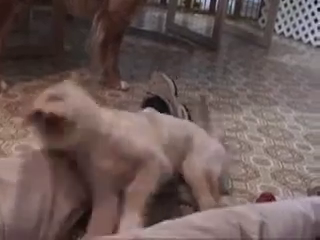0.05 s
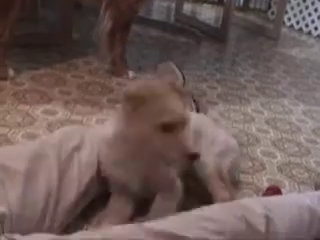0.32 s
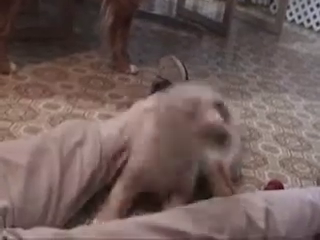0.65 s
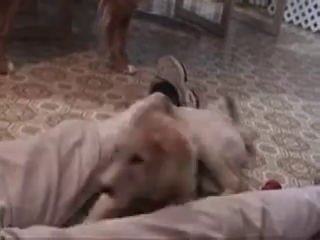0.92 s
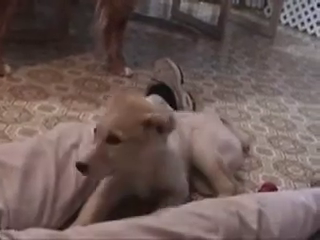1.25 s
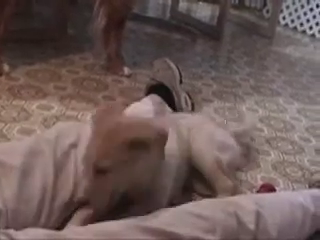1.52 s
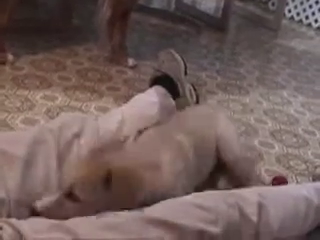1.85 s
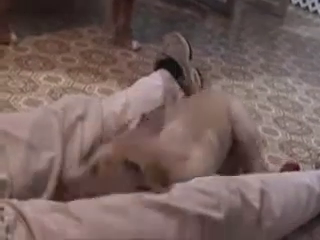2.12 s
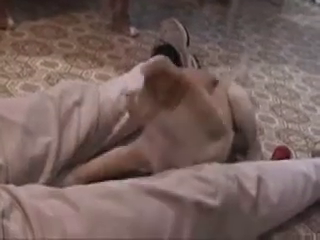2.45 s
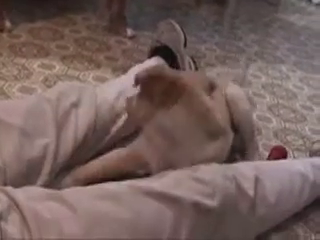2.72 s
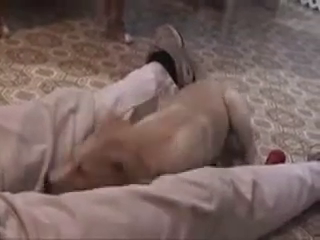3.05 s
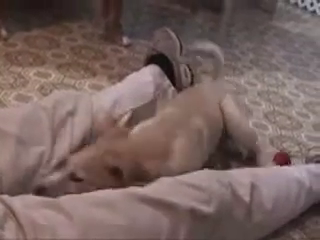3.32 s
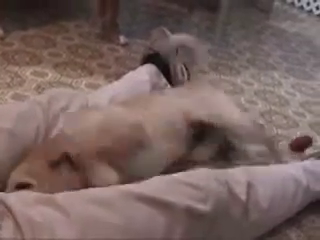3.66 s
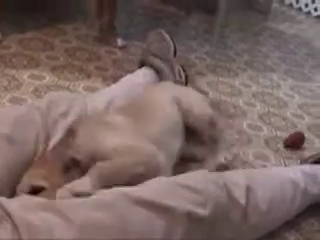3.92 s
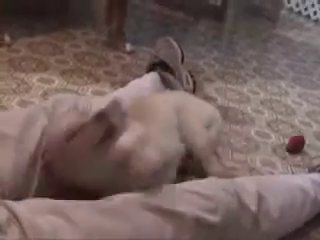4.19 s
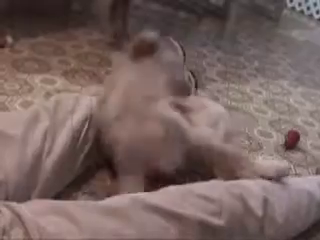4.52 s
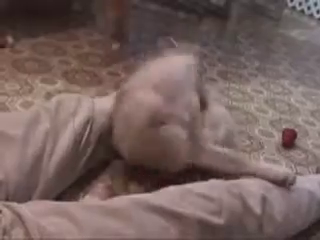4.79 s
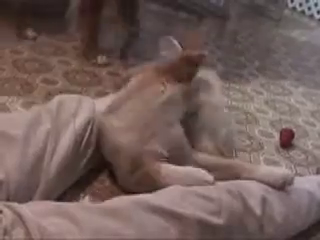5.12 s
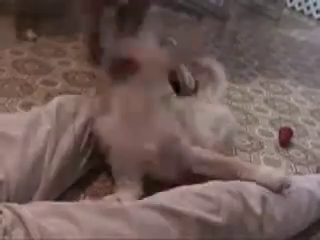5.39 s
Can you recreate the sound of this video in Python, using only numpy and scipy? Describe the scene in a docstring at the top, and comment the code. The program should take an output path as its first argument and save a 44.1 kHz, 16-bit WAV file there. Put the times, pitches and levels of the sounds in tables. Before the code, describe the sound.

A puppy play-fights on a hard kitchen floor, close to the microphone. It opens with thin nose whistles, a squeal and a whine, then its paws and body thump and its claws tick. A short bark sinks into a grumble. After a lull come more squeaks and a yelp that roughens into growls, with fur and a claw rubbing on trousers. A low groan slows to a rumble before a last thump.

```python
"""A puppy play-fights between a person's legs on a hard kitchen floor, close to the microphone.
First air whistles in its nose, and its vocal folds ring the throat in a squeal and a whine.
Paws and body thump the floor, claws tick, fur rubs on trousers. Near 2 s a bark sinks into a grumble.
After 3 s come more squeaks and a yelp that roughens into growls, while a claw rasps over cloth.
Last, a groan slows to a rumble before a final thump. A small room reverberates throughout."""
import sys
import numpy as np
from scipy import signal
from scipy.fft import rfft, irfft, next_fast_len
from scipy.io import wavfile
from scipy.ndimage import uniform_filter1d

SR = 44100
rng = np.random.default_rng(int(sys.argv[2]) if len(sys.argv) > 2 else 0)


def generate_wav(signal):
    """Clip the signal to [-1, 1] and save it as 16-bit WAV at the path in sys.argv[1]."""
    frames = np.transpose(np.atleast_2d(signal))
    scaled = np.clip(frames, -1, 1) * 32767
    pcm = np.round(scaled).astype(np.int16)
    wavfile.write(sys.argv[1], SR, pcm)


N = 245195
T = np.arange(N) / SR

# Fold vibration in each yelp: (start [s], end [s], first pitch [Hz], held pitch [Hz], last pitch [Hz],
# settling time [s], drooping time [s], first roughness [0-1], held roughness [0-1], last roughness [0-1])
YELP_FOLDS = {"squeal": (.09, .184, 1051, 936, 713, .011, .012, 0.091, .09, 0.15),
              "whine": (.18, .415, 513, 378, 328, .028, .012, .42, 0.036, .12),
              "bark": (1.81, 1.905, 398, 455, 290, 0.0045, .027, .9, .07, .7),
              "yelp": (3.222, 3.385, 452, 334, 330, 0.047, .03, .55, .12, .42)}
# Fold vibration in each growl: (time [s], pitch [Hz], roughness [0-1])
GROWL_FOLDS = {"grumble": [(1.9, 140.1, .9), (2.0, 129.3, .7), (2.11, 149.9, .9), (2.2, 128.6, 0.7)],
               "snarl": [(3.38, 166.4, .6), (3.44, 155.4, .95), (3.465, 162, .86), (3.485, 245.4, .44),
               (3.52, 248.8, .3), (3.555, 242.4, .9), (3.575, 224, 0.2)], "growl": [(3.86, 140.4, .7),
               (3.92, 157.4, .42), (4.03, 131.2, 0.6), (4.12, 124.2, .4), (4.16, 131.5, .5)],
               "tug": [(4.16, 130.8, .55), (4.31, 144, .5), (4.38, 125.6, .62)],
               "groan": [(4.635, 138.3, 0.8), (4.69, 155.9, .17), (4.77, 152.1, .16), (4.81, 145.5, .35)],
               "rumble": [(4.8, 146.7, 0.4), (4.88, 95.8, .7), (4.92, 91.94, .4), (5.03, 82.7, .45)]}
# Chest pushes driving each call: (start [s], length [s], low band [dB], middle band [dB], top band [dB])
CHEST_PUSHES = {"squeal": [(.093, .045, -66.5, -11, -40.5), (.139, .034, -62, -13.5, -30.5)],
                "whine": [(.172, .038, -27.5, -21, -27.5), (.222, 0.079, -29, -30.5, -47),
                (.297, .068, -22, -26.5, -37), (.378, .032, -25, -45, -55)],
                "bark": [(1.808, .009, -39.5, -14, -48), (1.817, .034, -23.5, -16.5, -38),
                (1.853, .024, -15.5, -16.5, -48.5)], "grumble": [(1.885, .032, -25, -36, -47.5),
                (1.955, .05, -29.5, -37.5, -49.5), (2.012, .04, -27.5, -40, -51.5),
                (2.075, .105, -37.5, -48, -70)], "snarl": [(3.372, .105, -29, -28, -47.5),
                (3.482, 0.067, -25.5, -29.5, -39), (3.556, .03, -32.5, -33, -56)],
                "yelp": [(3.221, 0.006, -42, -28, -53), (3.233, 0.035, -23.5, -16.5, -35.5),
                (3.276, .04, -23, -21.5, -36), (3.32, 0.057, -35, -29.5, -50)],
                "growl": [(3.85, .045, -24, -38, -60), (3.889, 0.058, -21.5, -32, -49),
                (3.955, .05, -22, -36.5, -56), (4.012, .145, -25.5, -43.5, -73)],
                "tug": [(4.154, .075, -23.5, -35.5, -54), (4.218, 0.11, -27.5, -41.5, -58)],
                "groan": [(4.639, .04, -36, -43, -44.5), (4.67, .046, -27.5, -29.5, -48.5),
                (4.72, .066, -28.5, -37.5, -67)], "rumble": [(4.802, .052, -29, -34, -67),
                (4.882, .07, -33.5, -61, -79), (4.966, .036, -37, -58, -62)]}
# Vocal tract responses, with peaks at the formants: (frequency [Hz], gain [dB])
SQUEAL_TRACT = [(300, -46), (700, -14), (950, 4), (1250, -12), (1650, -7.5), (1800, -18), (1900, -28.5),
                (2700, -33.5), (3500, -38.5), (3900, -47.5), (6000, -48.5), (9000, -41), (15000, -55)]
WHINE_TRACT = [(150, -33), (380, 3.5), (620, -3.5), (850, -0.5), (1150, -7.5), (1600, -23), (2000, -30),
               (2600, -14), (3100, -15), (4000, -28), (5200, -36.5), (8500, -28), (15000, -48.5)]
BARK_TRACT = [(200, -43.5), (420, -1), (620, -3), (840, 4.5), (1080, -21), (1330, -11.5), (1550, -21),
              (1800, -32.5), (2900, -26.5), (4500, -41.5), (8000, -46.5), (15000, -56)]
YELP_TRACT = [(200, -32), (380, 2), (640, -9.5), (810, 11), (930, 5), (1070, 2.5), (1500, -2.5),
              (2050, -32), (2900, -19.5), (3600, -15), (4400, -58), (12000, -49.5)]
GRUMBLE_TRACT = [(70, -19.5), (150, 3.5), (210, -3.5), (280, 1), (400, -1.5), (540, -3), (640, -19.5),
                 (850, -7), (1100, -17.5), (1450, -12), (1900, -30.5), (2950, -14), (4000, -50.5),
                 (12000, -39.5)]
SNARL_TRACT = [(120, -20.5), (330, 5.5), (500, 8), (620, -15), (780, 0), (1030, 1.5), (1320, -3.5),
               (1650, -13.5), (2050, -31), (2700, -20), (3600, -33), (4500, -48), (12000, -53)]
GROWL_TRACT = [(70, -29.5), (135, -3.5), (200, -6), (295, 1), (385, 3), (490, -7.5), (620, -18),
               (790, -5.5), (1050, -21), (1450, -27.5), (2050, -35.5), (2900, -27), (4500, -50),
               (9000, -70)]
TUG_TRACT = [(70, -27), (135, -8.5), (200, -8.5), (275, -1), (390, -6), (560, -10.5), (640, -14), (760, -5),
             (1050, -24), (1500, -16.5), (2050, -36), (2800, -30), (4000, -44), (9000, -46)]
GROAN_TRACT = [(80, -26), (155, -0.5), (310, -3.5), (460, 6), (620, -10), (850, -2), (1100, -14.5),
               (1600, -17), (1900, -18.5), (2400, -29), (3100, -27), (4500, -49), (10000, -37.5),
               (15000, -65.5)]
# Nose whistles: (start [s], length [s], first pitch [Hz], last pitch [Hz], level [dB])
NOSE_WHISTLES = [(0.034, .043, 6070, 6100, -39), (0.084, .023, 6760, 6060, -19),
                 (0.109, .05, 6150, 6620, -33.5), (.164, .01, 6850, 6930, -32.5),
                 (3.152, 0.025, 6010, 6250, -53), (3.172, 0.0155, 6200, 6410, -26),
                 (3.219, 0.0068, 6800, 6800, -41)]
# Blows of paws and body: (time [s], peak level [dB], contact cut-off [Hz])
FLOOR_BLOWS = [(.287, -31, 150), (.448, -38.5, 150), (.609, -25, 149), (.689, -41.5, 298),
               (.761, -24.5, 220), (.789, -19.5, 280), (.85, -41.5, 300), (.905, -12.5, 517),
               (1.647, -41.5, 220), (1.681, -28, 157), (2.017, -34.5, 400), (2.145, -35, 253),
               (3.036, -33, 128.7), (3.579, -36.5, 140), (3.826, -32, 177), (5.049, -21, 250)]
# Normal modes of the floor: (frequency [Hz], relative level [dB], time to decay by 60 dB [s])
FLOOR_MODES = [(127, -9, 0.12), (180, 11, 0.13), (216.6, 6, 0.24), (268, 12.5, 0.11), (334, 9.5, 0.099),
               (382, 0, 0.17), (500, 11.5, 0.045)]
# Claw and tooth contacts: (time [s], peak level [dB], cut-off [Hz], scrape decay time [s])
HARD_CONTACTS = [(.027, -42.5, 12120, .003), (.466, -26.5, 1600, 0.024), (0.688, -33.5, 3500, 0.00772),
                 (0.7718, -19, 1700, .004), (.854, -25.5, 1700, 0.0035), (1.519, -50.5, 2500, .006),
                 (1.65, -45, 1980, .006), (2.3933, -33, 1790, .007), (2.567, -41, 16000, 0.0019),
                 (2.963, -40.5, 1194, .02), (3.856, -29, 1600, 0.0061), (3.936, -33, 3500, .004),
                 (4.378, -28, 2000, .005), (5.309, -40, 6200, .006), (5.36, -42.5, 2200, .025)]
# Fur on cloth, bodies on the floor, a claw on the weave: (start [s], length [s], relative level [dB])
FUR_STROKES = [(.0, 0.14, -53), (.36, 0.18, -49), (.457, 0.076, -38), (1.87, 0.06, -51.5),
               (1.96, 0.3, -64.5), (3.66, 0.25, -66), (4.22, 0.14, -58.5), (5.29, 0.056, -60)]
SHUFFLES = [(.0, 0.86, -57.5), (.68, 0.18, -51), (1.6, .65, -53), (2.9, 0.37, -65), (3.16, 0.53, -53.5),
            (3.8, .6, -52.5), (4.635, 0.36, -52.5), (5.28, 0.24, -56)]
CLAW_DRAGS = [(4.22, .14, -58), (4.277, .019, -47), (4.358, .03, -49)]
# Spectra of the contact noises and of the background hush: (frequency [Hz], relative level [dB])
TICK_SPECTRUM = [(200, -24.5), (560, -15), (790, 1.5), (980, -3.5), (1220, 3.5), (1750, -12), (2450, -5.5),
                 (3200, -14.5), (7000, -19), (15000, -23)]
FUR_SPECTRUM = [(290, -60), (500, -30), (758, -10.5), (997, -24.5), (1510, -1), (1960, -10.5), (2930, -1),
                (3790, -5.5), (4440, -3.5), (15500, -12.5)]
SHUFFLE_SPECTRUM = [(40, -31), (80, -18.5), (130, -5), (190, -7), (300, -9), (450, -4.5), (600, -12.5),
                    (1150, -15.5), (1800, -15), (3000, -25.5), (6000, -30), (15000, -40.5)]
RASP_SPECTRUM = [(1500, -23), (3400, -2), (4450, 7), (5400, -16), (7000, -21), (15000, -20)]
HUSH_SPECTRUM = [(12, -39), (20, -16.5), (162, 0.5), (232, -11.5), (275, -1), (599, -18), (728, -5),
                 (1170, -5.5), (1310, -11.5), (2350, -10), (2850, -14), (3880, -11), (5420, -16.5),
                 (5890, -16), (15600, -21)]
# Balance at the microphone for each source position: (frequency [Hz], left minus right [dB])
HEAD_DOWN = [(130, 5), (260, -0.5), (440, 8.5), (520, -0.5), (630, -3.5), (800, -5), (980, -5.5),
             (1170, 5.5), (1400, 8.5), (1750, -4), (2200, -4), (2600, 5.5), (3200, -3), (4500, 2)]
HEAD_UP = [(130, 2.5), (340, 2.5), (450, 0), (650, -3.5), (930, -0.5), (1080, -7), (1350, 9), (1650, -20),
           (2100, 1), (3300, -7), (5000, -1)]
ON_FLOOR = [(130, 4), (480, 3), (750, -3.5), (1000, -4.5), (1400, 6.5), (2000, -2), (5000, 2)]
# Phase between the microphone ports: (frequency [Hz], lag of the left [rad])
PORT_LAG = [(90, 0.93), (170, 1.3), (280, 0.38), (450, 0.91), (750, 0.29), (1050, -0.91), (1550, -0.036),
            (2200, -1), (2800, 0.99), (4500, 0)]
# Reverberation of the kitchen: (frequency [Hz], time to decay by 60 dB [s])
ROOM_DECAY = [(150, 0.42), (500, 0.33), (1200, 0.39), (3000, 0.41), (7000, 0.27), (14000, .15)]
# Coherence of the diffuse field: (frequency [Hz], left-right correlation [-1 to 1])
COHERENCE = [(60, -0.59), (150, -0.42), (380, 0.15), (950, -0.56), (2380, 0.3), (5980, 0.48), (15000, 1)]


def yelps():
    """Nearly periodic fold vibration gives high, clear calls; the squeal breaks down an octave."""
    return (call("squeal", yelp_contour, SQUEAL_TRACT, attack_s=.027, release_s=.013, even_s=.023)
            + call("whine", yelp_contour, WHINE_TRACT, attack_s=.02, release_s=.011, even_s=.015)
            + call("bark", yelp_contour, BARK_TRACT, attack_s=.0076, release_s=.014, even_s=.0038)
            + call("yelp", yelp_contour, YELP_TRACT, attack_s=.011, release_s=.032, even_s=.014))


def growls():
    """Slow, aperiodic fold vibration is heard as roughness."""
    return (call("grumble", growl_contour, GRUMBLE_TRACT, attack_s=.024, release_s=.025)
            + call("snarl", growl_contour, SNARL_TRACT, attack_s=.023, release_s=.012, even_s=.014)
            + call("growl", growl_contour, GROWL_TRACT, attack_s=.026, release_s=.028, even_s=.016)
            + call("tug", growl_contour, TUG_TRACT, attack_s=.025, release_s=.023, even_s=.021))


def groan():
    """Steadier pulses give a low, clear tone that sinks to a rumble as their rate falls."""
    return (call("groan", growl_contour, GROAN_TRACT, attack_s=.022, release_s=.022)
            + call("rumble", growl_contour, GROWL_TRACT, attack_s=.012, release_s=.02))


def call(name, contour, tract, attack_s, release_s, even_s=.02, linger_s=.005):
    """Source-filter principle: the folds excite the tract; chest pushes swell three frequency bands."""
    pushes = CHEST_PUSHES[name]
    t = pushes[0][0] - .03 + T[:SR // 2]
    hz = bins(len(t))
    pitch, rough = contour(name, t)
    voice = rfft(colour(vocal_folds(pitch, rough, t), tract))
    group_delay_s = linger_s / (1 + hz / 1500)   # lows linger in the throat
    voice *= np.exp(-2j * np.pi * np.cumsum(group_delay_s) * SR / len(t))
    low, below_top = [1 / (1 + (hz / edge_hz) ** 16) for edge_hz in (620, 2100)]
    shares = (low, below_top - low, 1 - below_top)
    out = np.zeros(N)
    for share, envelope in zip(shares, swells(pushes, t, attack_s, release_s)):
        band = irfft(voice * share, len(t))
        power = band ** 2
        for _ in range(2):
            power = uniform_filter1d(power, int(even_s * SR))
        levelled = band / np.sqrt(np.abs(power) + 1e-14)   # the pushes then set the loudness
        add(out, t[0], levelled * envelope)
    return out


def vocal_folds(pitch, rough, t, jitter=.12, shimmer_db=5, closure_hz=3400, husk_db=-12):
    """Glottal pulses: one puff a cycle. Roughness adds jitter, shimmer, a second flap and turbulence."""
    cycles = np.cumsum(pitch * np.exp(jitter * rough * wander(pitch.mean(), t))) / SR
    flap_cycles = cycles + .398 + .12 * wander(30, t)
    puffs = np.zeros(len(t))
    for turn, weight in ((cycles, np.ones(len(t))), (flap_cycles, rough)):
        count = np.floor(turn)
        at = np.flatnonzero(np.diff(count) > 0)
        late = (count[at + 1] - turn[at]) / (turn[at + 1] - turn[at])   # fraction of a sample
        strength = weight[at] * from_db(shimmer_db * rough[at] * rng.standard_normal(len(at)))
        puffs[at] += strength * (1 - late)
        puffs[at + 1] += strength * late
    buzz = low_pass(unit_rms(puffs - puffs.mean()), closure_hz, order=1)   # soft closure dulls the puffs
    hiss = unit_rms(rng.standard_normal(len(t)) * np.exp(-1.6 * (cycles % 1)))
    husk = hiss - low_pass(hiss, closure_hz, order=1)
    return buzz + rough * hiss + from_db(husk_db) * husk


def yelp_contour(name, t, steadying_s=.013, breaking_s=.018):
    """Exponential relaxation: pitch and roughness settle, then give way as the air runs out."""
    start, end, first_hz, held_hz, last_hz, settle_s, droop_s, first, held, last = YELP_FOLDS[name]
    since, left = np.maximum(t - start, 0), np.maximum(end - t, 0)
    settling = (first_hz - held_hz) * np.exp(-since / settle_s)
    droop = (last_hz - held_hz) * np.exp(-left / droop_s)
    onset_rough = (first - held) * np.exp(-since / steadying_s)
    end_rough = (last - held) * np.exp(-left / breaking_s)
    return held_hz + settling + droop, held + onset_rough + end_rough


def growl_contour(name, t):
    """Piecewise-linear modulation of a growl's pitch and roughness."""
    times, pitch, rough = np.transpose(GROWL_FOLDS[name])
    return np.interp(t, times, pitch), np.interp(t, times, rough)


def nose_squeaks(waver=.0087, flutter_db=3.5, overtone_db=-38, glide_share=.25):
    """Aerodynamic whistle: air in the nose sounds an almost pure tone that slides onto its note."""
    out, t = np.zeros(N), T[:SR // 8]
    for start, length_s, first_hz, last_hz, db in NOSE_WHISTLES:
        hz = last_hz + (first_hz - last_hz) * np.exp(-t / (glide_share * length_s))
        phase = 2 * np.pi * np.cumsum(hz * (1 + waver * wander(500, t))) / SR
        envelope = swell(t, 0, length_s, attack_s=.004, release_s=.007)
        gain = from_db(db + flutter_db * wander(300, t))
        add(out, start, envelope * gain * (np.sin(phase) + from_db(overtone_db) * np.sin(2 * phase)))
    return out


def floor_thumps(flex_hz=136, press_s=.034, ring_db=-15, rub_db=-13, rub_s=.032, lowest_hz=95):
    """Modal response: a padded blow flexes and rings the floor; softer contact excites less treble."""
    out, t = np.zeros(N), T[:SR // 3]
    press = np.sin(np.pi * np.sqrt(np.minimum(t / press_s, 1)))
    flex = press * np.sin(2 * np.pi * flex_hz * t)
    bass_cut = signal.butter(4, lowest_hz, "high", fs=SR, output="sos")
    for start, db, cutoff_hz in FLOOR_BLOWS:
        ring = sum(rng.choice([-1, 1]) * from_db(mode_db - 60 * t / t60) * np.sin(2 * np.pi * hz * t)
                   for hz, mode_db, t60 in FLOOR_MODES)
        rub = unit_rms(low_pass(rng.standard_normal(len(t)), hz=760)) * np.exp(-t / rub_s)
        blow = low_pass(flex + from_db(ring_db) * ring + from_db(rub_db) * rub, cutoff_hz)
        blow = signal.sosfilt(bass_cut, blow)
        add(out, start, from_db(db) * blow / np.abs(blow).max())
    return out


def ticks(tail_s=.022, tail_db=-19):
    """Impact excitation: a claw or tooth lands with a crack or short scrape and rings briefly."""
    out, t = np.zeros(N), T[:SR // 8]
    for start, db, cutoff_hz, scrape_s in HARD_CONTACTS:
        envelope = np.exp(-t / scrape_s) + from_db(tail_db) * np.exp(-t / tail_s)
        contact = rng.standard_normal(len(t)) * envelope
        tick = low_pass(colour(contact, TICK_SPECTRUM), cutoff_hz, order=1)
        add(out, start, from_db(db) * tick / np.abs(tick).max())
    return out


def fur_swishes(gain_db=6):
    """Sliding friction: fur catches on cloth in fine grains."""
    strokes, = swells(FUR_STROKES, T, attack_s=.058, release_s=.028)
    return from_db(gain_db) * strokes * friction(FUR_SPECTRUM, grains_per_s=400, depth_db=1.5)


def body_shuffles(gain_db=1.5):
    """Friction under a shifting load: bodies slide on the floor with a dull, lumpy noise."""
    shifts, = swells(SHUFFLES, T, attack_s=.087, release_s=.091)
    return from_db(gain_db) * shifts * friction(SHUFFLE_SPECTRUM, grains_per_s=45, depth_db=5.5)


def claw_rasp():
    """Stick-slip friction: a claw snags on thread after thread."""
    drags, = swells(CLAW_DRAGS, T, attack_s=.0087, release_s=.023)
    return drags * friction(RASP_SPECTRUM, grains_per_s=250, depth_db=5.5)


def friction(spectrum, grains_per_s, depth_db):
    """Many small contacts sum to noise whose amplitude fluctuates at random."""
    grains = rng.standard_normal(N) * from_db(depth_db * wander(grains_per_s, T))
    return unit_rms(colour(grains, spectrum))


def direct_sound(x, balance):
    """Near-field pickup: the two microphone ports receive a source at unequal level and phase."""
    size = next_fast_len(N + SR // 4, real=True)
    hz = bins(size)
    left = from_db(at_hz(balance, hz) / 2) * np.exp(-.5j * at_hz(PORT_LAG, hz))
    pair = np.array([left, 1 / left])
    return irfft(rfft(x, size) * pair / np.abs(pair.mean(axis=0)), size)[:, :N]


def kitchen(x, first_echo_s=.0056):
    """Reverberation: dense reflections decay exponentially, soonest in the high treble."""
    t = T[:SR // 2]
    noise, hz, tail = rfft(diffuse_field(len(t))), bins(len(t)), 0
    edges_hz = np.geomspace(70, 18000, 9)
    for low, high in zip(edges_hz, edges_hz[1:]):
        band = irfft(noise * (hz >= low) * (hz < high), len(t))
        t60 = at_hz(ROOM_DECAY, np.sqrt(low * high))
        tail += band * from_db(-60 * t / t60)
    tail *= t > first_echo_s
    return signal.fftconvolve(x[None], tail / np.sqrt(np.sum(tail ** 2) / 2), axes=1)[:, :N]


def hush(level_db=-55.5):
    """Ambient noise: a faint, steady diffuse field."""
    return from_db(level_db) * unit_rms(colour(diffuse_field(N), HUSH_SPECTRUM))


def diffuse_field(size):
    """Noise arriving from all round is partly coherent between left and right."""
    alike = np.clip(at_hz(COHERENCE, bins(size)), -.95, .98)
    mid, side = rfft(rng.standard_normal((2, size)))
    return irfft(np.sqrt(1 + alike) * mid + np.sqrt(1 - alike) * side * [[1], [-1]], size)


def swell(t, start, length_s, attack_s, release_s):
    """Amplitude envelope: rounded attack, hold, exponential decay."""
    rise = np.sin(np.pi / 2 * np.clip((t - start) / attack_s, 0, 1)) ** 2
    return rise * np.exp(-np.maximum(t - start - length_s, 0) / release_s)


def swells(rows, t, attack_s, release_s):
    """Incoherent summation: swells add in power, giving one envelope per level column."""
    power = sum(np.outer(from_db(db), swell(t, start, length_s, attack_s, release_s)) ** 2
                for start, length_s, *db in rows)
    return np.sqrt(power)


def colour(x, spectrum):
    """Minimum-phase filter: folding the cepstrum makes the response causal."""
    size = next_fast_len(x.shape[-1] + 4096, real=True)
    cepstrum = irfft(np.log(from_db(at_hz(spectrum, bins(size)))), size)
    cepstrum[1:size // 2] *= 2
    cepstrum[size // 2 + 1:] = 0
    return irfft(rfft(x, size) * np.exp(rfft(cepstrum)), size)[..., :x.shape[-1]]


def low_pass(x, hz, order=2):
    """Maximally flat low-pass filter."""
    return signal.sosfilt(signal.butter(order, hz, fs=SR, output="sos"), x)


def wander(per_s, t):
    """Random modulation: per_s values a second, joined by lines."""
    values = rng.standard_normal(len(t) // 20)
    return np.interp((t - t[0]) * per_s, np.arange(len(values)), values)


def add(out, start_s, sound):
    """Superpose a sound from start_s on."""
    i = max(round(start_s * SR), 0)
    out[i:i + len(sound)] += sound[:N - i]


def at_hz(points, hz):
    """Interpolation on a log-frequency axis."""
    knots_hz, values = np.transpose(points)
    return np.interp(np.log(hz + .00067), np.log(knots_hz), values)


def bins(size):
    """Frequencies of a real transform."""
    return np.arange(size // 2 + 1) * SR / size


def from_db(db):
    """Level to amplitude ratio."""
    return 10 ** (np.asarray(db) / 20)


def unit_rms(x):
    """Normalisation to unit power."""
    return x / np.sqrt(np.mean(x ** 2) + 1e-20)


def scene():
    """Superposition of direct sound, reverberation and ambient noise."""
    yelping, growling, groaning, nose = yelps(), growls(), groan(), nose_squeaks()
    floor, claws = floor_thumps(), ticks()
    rubbing = fur_swishes() + body_shuffles() + claw_rasp()
    direct = (direct_sound(yelping + growling + nose, HEAD_DOWN)
              + direct_sound(groaning, HEAD_UP)
              + direct_sound(floor + claws + rubbing, ON_FLOOR))
    into_room = (from_db(-10) * yelping + from_db(-9.5) * growling + from_db(-6) * groaning
                 + from_db(-8.5) * (nose + floor) + from_db(-8) * claws)
    return direct + kitchen(into_room) + hush()


def record(dry, cutoff_hz=15750):
    """Band limiting: a steep elliptic low-pass removes the highest treble."""
    return signal.sosfilt(signal.ellip(12, .1, 80, cutoff_hz, fs=SR, output="sos"), dry)


dry = scene()
out = record(dry)
generate_wav(out)
```